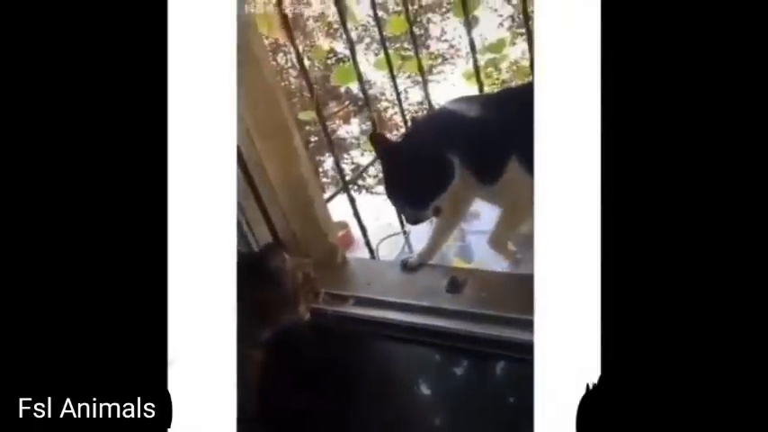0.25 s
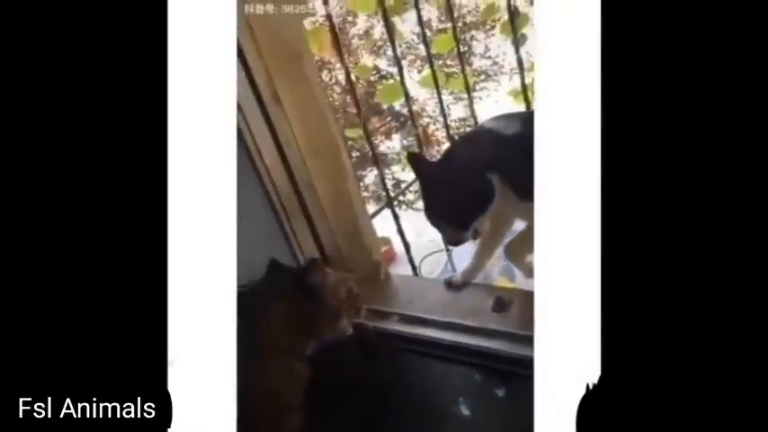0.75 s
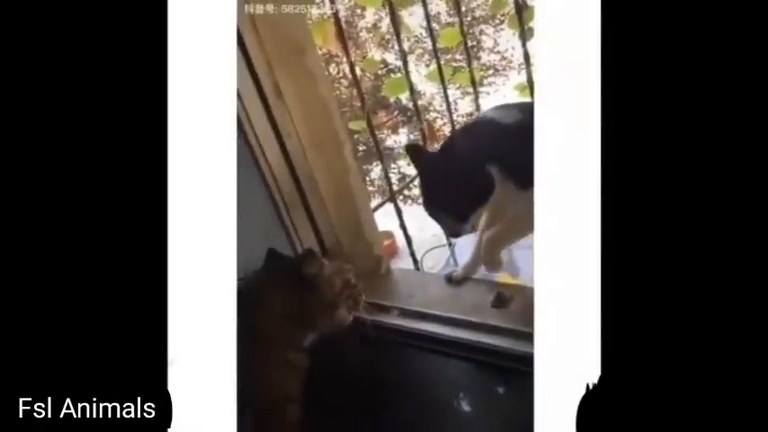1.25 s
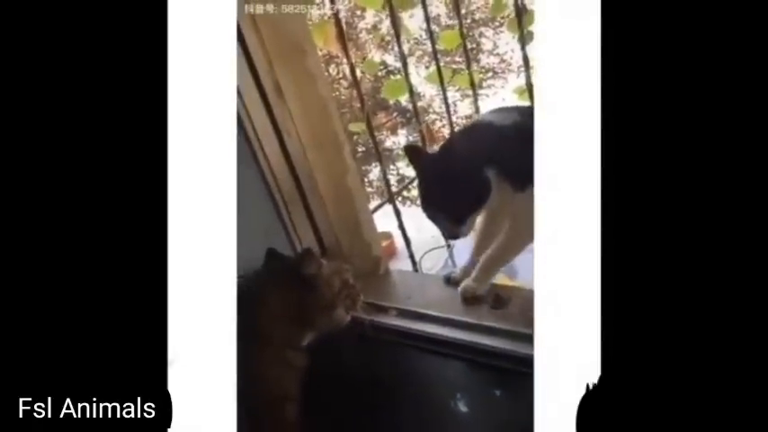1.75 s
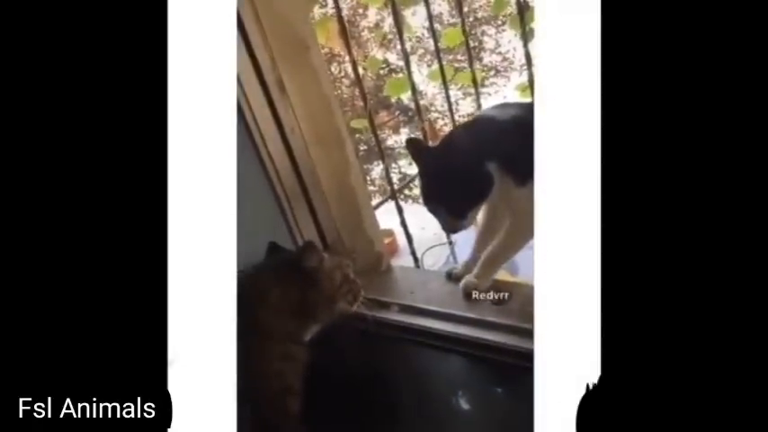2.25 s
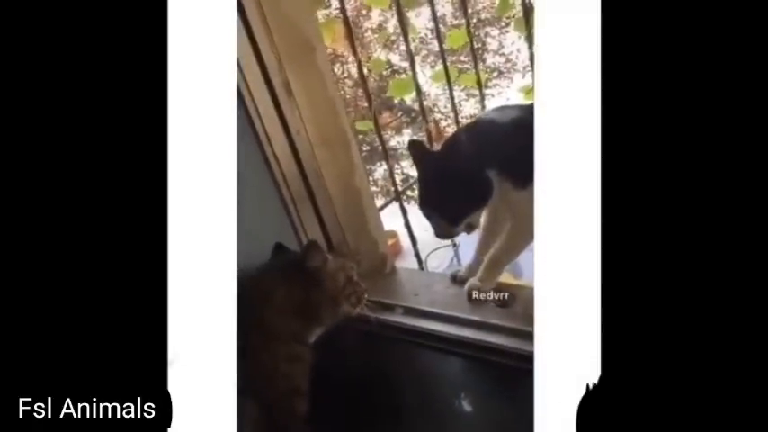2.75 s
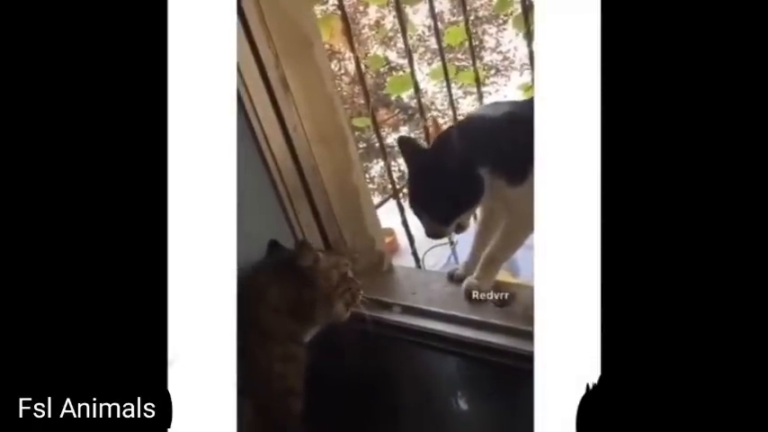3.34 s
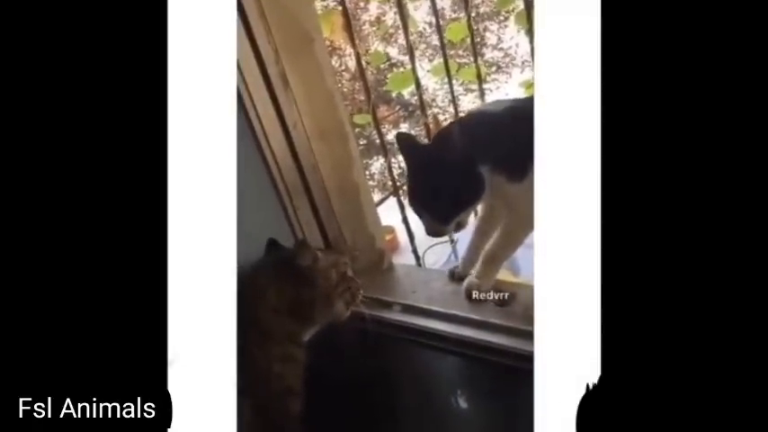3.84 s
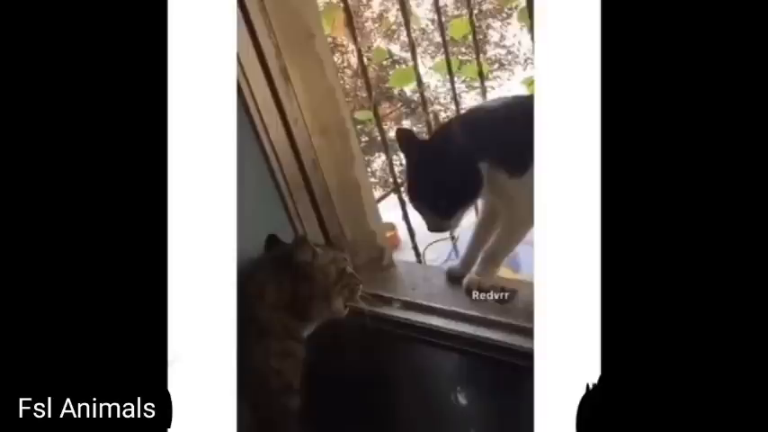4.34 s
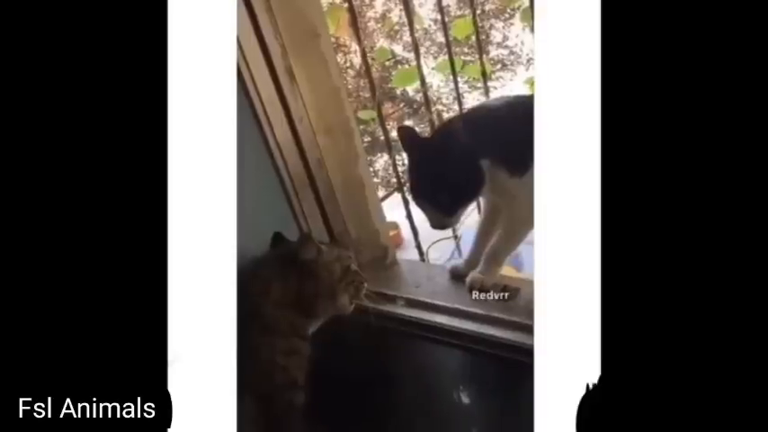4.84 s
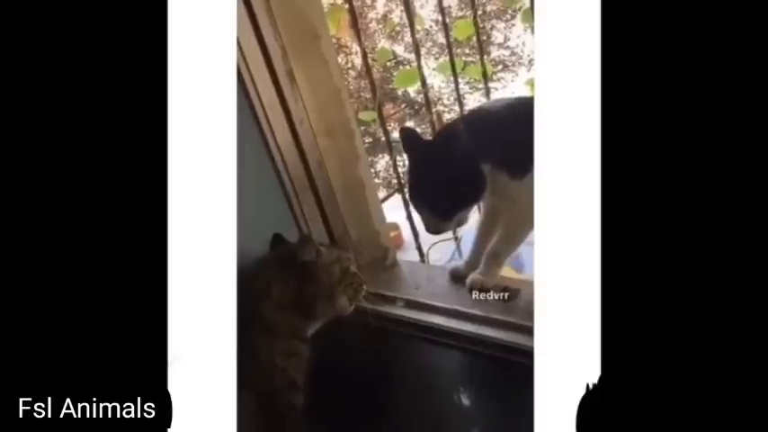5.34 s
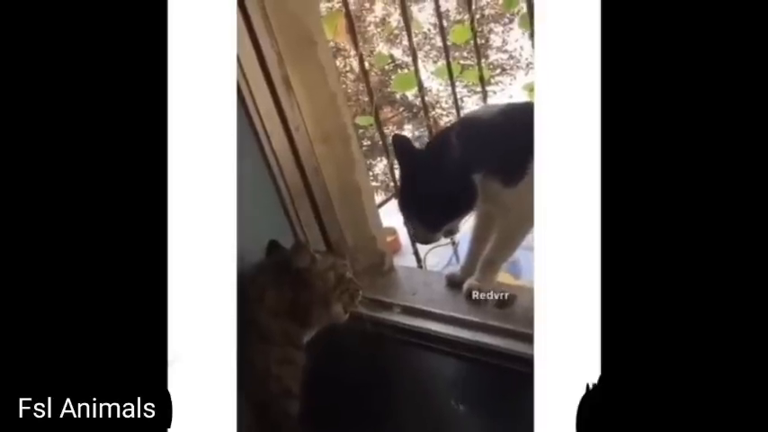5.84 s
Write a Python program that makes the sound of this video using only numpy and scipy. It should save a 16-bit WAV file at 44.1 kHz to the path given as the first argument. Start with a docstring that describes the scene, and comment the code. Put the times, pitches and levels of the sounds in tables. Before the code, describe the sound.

Two cats yowl at each other in a small room, one in clear gliding wails, the other in lower, hoarse moans.

```python
"""Two cats yowl at each other across the sill of an open window; a small hard room rings behind them.
They start together: one sinks in a long, clear wail, the other holds a lower, hoarse moan that breaks
into half tones and rasps. Both die away, with thin squeaks and soft ticks. At 2.4 s a second wail rises
and sinks, joined at 2.9 s by a moan that lasts to the end. At 5.1 s a third wail climbs as a faint low
rumble swells. Each voice is a source and a filter: vibrating vocal folds heard through resonances."""
import sys
import numpy as np
from scipy import signal
from scipy.fft import rfft, irfft, next_fast_len
from scipy.io import wavfile
from scipy.ndimage import map_coordinates

SR = 44100
rng = np.random.default_rng(int(sys.argv[2]) if len(sys.argv) > 2 else 0)


def pcm_store(signal):
    """Save signal as 16-bit PCM."""
    levels = np.round(np.clip(np.atleast_2d(signal), -1, 1) * 32767)
    wavfile.write(sys.argv[1], SR, levels.astype(np.int16).T)


N = 268128
TIME = np.arange(N) / SR


# one table a wail; the gains act chiefly on harmonic 2, on harmonics 3-4, and on all above:
# (time [s], pitch [Hz], throat gain [dB], mouth gain [dB], treble gain [dB])
FIRST_WAIL = [(0.0, 650.4, 12, -1, 9.5), (0.12, 648, 11, 0, 2), (0.24, 626.8, 10, -2, 5.5),
              (0.42, 620.7, 10.5, 2, 5.5), (0.63, 589, 2.5, -2, 1.5), (0.84, 578.9, 5.5, -7, 4),
              (0.87, 575, 1.5, -0.5, 6.5), (1.02, 553, 0, -7, 2), (1.05, 543.8, 1.5, 0, 2.5),
              (1.17, 539.3, 0.5, 2, 1), (1.23, 531.8, -2.0, -7, 1.5), (1.47, 501.1, 2.5, -0.5, -4.5),
              (1.56, 485.8, -2.5, -7.5, -0.5), (1.74, 432, 3, -12.0, -6.5), (1.781, 385, -9, -18, -12.0)]
SECOND_WAIL = [(2.395, 414, -15, -30, -24), (2.44, 418.7, 5.5, -3.5, -10.5), (2.56, 511, 3.5, 3, 2),
               (2.71, 578.6, 2, 0, 4), (2.8, 602.2, 1, 0, 5), (2.92, 612.6, -3.5, 0.5, 7),
               (3.01, 606, -5.5, -5.5, 6), (3.07, 613.4, 0, 5, 8), (3.221, 606.4, -7, -2.5, 6),
               (3.249, 603.6, 0, -0.5, 5), (3.67, 569.7, -3.5, 1, -1), (3.79, 561, -2.5, -1, 0),
               (3.941, 545.4, 1, 4, -1.5), (4.03, 529.3, -4, 1, -2), (4.18, 492.4, -3.5, -.5, -6),
               (4.27, 475, -9, 1, -13), (4.36, 441.6, -1.5, -8, -18), (4.441, 385, -6, -21, -19)]
THIRD_WAIL = [(5.12, 419.3, -14, -9, -18), (5.15, 411.7, -3.5, -18, -8), (5.24, 445.2, 4, -15, -15),
              (5.3, 475.7, -17, -3, -5), (5.331, 487, 0, 5, -5), (5.45, 531.4, -3.5, 6.5, 0.5),
              (5.57, 562, -4.5, 0.5, 0), (5.72, 591.3, -5, -0.5, 2.5), (5.81, 591.7, -18.5, -4, 3.5),
              (5.871, 602, 0, -1, 1.5), (6.061, 591.2, -7.5, 0.5, 3)]
# nasal ring, one row a wail: (centre [harmonic number], half width [harmonics], gain [dB])
NASAL_RINGS = [(11.8, 1.3, 9), (11.7, 1.66, 11), (9.35, 1.4, 9)]
def high_cat():
    """Phonation: nearly periodic vibration of the vocal folds gives three clear, gliding wails."""
    return sum(wail(rows, ring) for rows, ring in zip((FIRST_WAIL, SECOND_WAIL, THIRD_WAIL), NASAL_RINGS))


# vocal tract resonances for the four strong harmonics: (frequency [Hz], gain [dB])
TRACT_RESONANCES = [(400, -40), (530, -32.9), (640, -38), (850, -34), (1000, -22), (1130, -23.5),
                    (1270, -27), (1370, -39), (1460, -35.5), (1600, -25), (1720, -24.5), (1850, -28.5),
                    (1950, -38), (2100, -34.5), (2350, -21), (2600, -20.5)]
# breath noise: (frequency [Hz], relative spectral density [dB])
WAIL_BREATH = [(300, -16), (2000, 7.5), (3200, -6.5), (4100, -6), (5200, 1.5), (7000, 7), (9000, 3.5),
               (12000, -7.5)]
def wail(rows, ring, air_db=-61, shimmer=0.097, creak=0.36, strong_flicker_db=1.26, weak_flicker_db=4.0):
    """Source and filter: harmonics swell and fade as they slide through resonances, over faint breath."""
    at, t, gate = call_span(rows, attack_s=.003, release_s=0.024)
    pitch_hz, throat_db, mouth_db, treble_db = in_time(rows, t)
    slack = np.clip((520 - pitch_hz) / 100, 0, 1)   # slack folds at low pitch beat less evenly
    phase = fold_phase(pitch_hz, t, waver=.0015, jitter=.0015 + .012 * slack)
    efforts_db = [0.07 * throat_db, throat_db, mouth_db, mouth_db]   # the fundamental barely follows
    strong_db = [db + at_hz(TRACT_RESONANCES, k * pitch_hz) + strong_flicker_db * drift(13.8, t)
                 for k, db in enumerate(efforts_db, 1)]
    weak_db = [treble_db + head_db(k, pitch_hz, ring) + weak_flicker_db * drift(9.36, t)
               for k in range(5, 21)]
    push_db = 3 * np.log2(pitch_hz / pitch_hz.max())   # a higher wail is pushed with more air
    voice = from_db(treble_db + air_db + push_db) * colour(puffs(phase), WAIL_BREATH)
    for k, level_db in enumerate(strong_db + weak_db, 1):
        voice += np.sqrt(2) * from_db(level_db) * np.sin(k * phase)
    out = np.zeros(N)
    out[at] = voice * gate * (1 + shimmer * drift(60.27, t) + creak * slack * drift(130, t))
    return out


# upper resonances of the high cat: (frequency [Hz], gain [dB])
HEAD_RESONANCES = [(2200, -48.5), (2550, -48.5), (2800, -56.5), (3050, -45), (3300, -54), (3650, -64.5),
                   (4050, -77), (4400, -67), (4750, -65.7), (5150, -68), (5700, -71), (6300, -73),
                   (7600, -73), (9500, -80), (12000, -91.5)]
def head_db(k, pitch_hz, ring):
    """Formant filtering: gain of harmonic k from fixed resonances and a ring that follows the pitch."""
    centre, half_width, ring_db = ring
    return at_hz(HEAD_RESONANCES, k * pitch_hz) + ring_db * np.exp(-((k - centre) / half_width) ** 2)


# one table a moan, with the relative levels of its three resonances:
# (time [s], pitch [Hz], throat level [dB], mouth level [dB], edge level [dB])
FIRST_MOAN = [(0, 445.8, -32.5, -21, -30), (.16, 454.3, -38.5, -25, -29.5), (.24, 451, -36, -25, -37.5),
              (.45, 432, -35.5, -25, -33.5), (.6, 406.8, -35, -23.5, -39.5), (.88, 396.2, -41, -23, -36),
              (1.06, 381.1, -40, -25.5, -41), (1.25, 340.2, -42, -22.5, -45),
              (1.52, 339.3, -60, -27.5, -50), (1.72, 327.3, -33, -31, -45.5),
              (1.88, 334.7, -36.5, -28.5, -42), (2.09, 315.6, -28.5, -28.5, -50),
              (2.2, 281.5, -27.5, -44, -57), (2.24, 252.4, -47, -45, -68)]
SECOND_MOAN = [(2.9, 438, -32.5, -36, -58), (2.98, 342.7, -41.5, -42, -56), (3.16, 364.3, -44, -46, -70),
               (3.25, 325.3, -42.5, -35, -58), (3.36, 349, -45, -36.5, -73), (3.6, 347.4, -43, -37, -63),
               (3.85, 363.4, -36.5, -39, -68), (4.24, 385.6, -40.5, -32, -37),
               (4.42, 354.2, -38.5, -30.5, -42), (4.58, 346, -33.5, -25.5, -60),
               (4.76, 334.8, -38.5, -28.5, -54), (4.9, 325.3, -31.5, -27, -64.5),
               (5.04, 358, -31, -27.5, -65), (5.17, 337.6, -37.5, -23, -62), (5.34, 327, -29, -27.5, -43.5),
               (5.62, 316.2, -42.5, -36, -38.5), (5.86, 346.4, -37.5, -36.5, -42),
               (6.08, 336, -46, -33.5, -43.5)]
def low_cat():
    """Irregular phonation: unevenly beating folds give two moans, the second hoarser."""
    first = moan(FIRST_MOAN, attack_s=0.0013, rest_half_db=-27, rest_rasp_db=-20.5, fundamental_db=-31.5)
    second = moan(SECOND_MOAN, attack_s=0.013, rest_half_db=-20, rest_rasp_db=-13.5, fundamental_db=-30)
    return first + second


# resonances that follow the jaw: (time [s], mouth centre [Hz], mouth bandwidth [Hz], edge centre [Hz])
JAW_RESONANCES = [(0, 2016, 562, 3530), (.9, 2000, 325, 3240), (1.2, 1790, 396, 2860),
                  (2.05, 1785, 545, 3000), (2.24, 1620, 500, 2800), (3.2, 1605, 610, 3230),
                  (3.6, 1813, 519.4, 3250), (4.25, 1935, 680.6, 2710), (4.6, 1946, 496, 3160),
                  (4.9, 1820, 547, 3000), (5.03, 1745, 230, 3000), (5.25, 1740, 228.2, 3000),
                  (5.6, 1876, 610, 2860)]
# brief dips of the fundamental: (time [s], half length [s], depth [dB])
DROPOUTS = [(3.05, 0.072, 7), (4.88, 0.036, 16), (5.384, 0.071, 12.5)]
# turbulence in the throat: (frequency [Hz], relative spectral density [dB])
MOAN_BREATH = [(120, -35), (220, -33), (500, -6.5), (750, -17), (1050, -2.5), (1450, -11.5), (1800, 7),
               (2350, 2.5), (2580, 1), (2800, -25), (3300, -18.5), (4200, -46.5)]
# thin treble of the closing folds: (frequency [Hz], relative gain [dB])
MOAN_TREBLE = [(3600, -18), (4500, 8), (5500, 5.5), (7500, -6), (12000, -21.5)]
def moan(rows, attack_s, rest_half_db, rest_rasp_db, fundamental_db, count=28):
    """Period doubling: alternating strong and weak cycles add half tones; uneven cycles add rasp."""
    at, t, gate = call_span(rows, attack_s, release_s=0.0085)
    pitch_hz, throat_db, mouth_db, edge_db = in_time(rows, t)
    mouth_hz, mouth_width_hz, edge_hz = in_time(JAW_RESONANCES, t)
    half_db, rasp_db = hoarseness(t, rest_half_db, rest_rasp_db)
    rasp = from_db(rasp_db)
    phase = fold_phase(pitch_hz, t, waver=.0042, jitter=.005) + .2 * rasp * drift(200, t)
    multiple = np.arange(2, count + 2)[:, None] / 2   # harmonics and the half tones between them
    partial_hz = multiple * pitch_hz
    flicker = from_db([3 * drift(12, t) for _ in multiple])
    strength = np.where(multiple % 1 == 0, 1, from_db(half_db)) * flicker
    notch = 1 - from_db(-7.5) * np.exp(-((partial_hz - 2920) / 240) ** 2)   # cut by a side cavity
    throat = from_db(throat_db - 4.5) * resonance(partial_hz, strength, hz=1000, width_hz=426)
    mouth = from_db(mouth_db - 2.2) * resonance(partial_hz, strength * notch, mouth_hz, mouth_width_hz)
    edge = from_db(edge_db - 3) * resonance(partial_hz, strength, edge_hz, width_hz=610)
    amplitude = np.sqrt(throat ** 2 + mouth ** 2 + edge ** 2)
    voice = np.sum(amplitude * np.sin(multiple * phase + rng.uniform(0, 2 * np.pi, (count, 1))), axis=0)
    voice *= 1 + 0.64 * rasp * drift(330, t)
    voice += from_db(np.maximum(mouth_db, throat_db) - 1) * rasp * colour(puffs(phase), MOAN_BREATH)
    # the fundamental and its subharmonic take part of the mouth's swing
    dropout_db = sum(depth_db * np.exp(-((t - s) / half_s) ** 2) for s, half_s, depth_db in DROPOUTS)
    low_tones = np.sin(phase) + from_db(half_db - 13.5) * np.sin(phase / 2)
    voice += from_db(0.42 * mouth_db + fundamental_db - dropout_db) * low_tones
    # the sharp closing of the folds and its turbulence give a thin treble
    closing = rms_one(sum(np.cos(k * phase) for k in range(1, count))) + 2.1 * puffs(phase)
    voice += from_db((edge_db + mouth_db) / 2 - 25) * colour(closing, MOAN_TREBLE)
    out = np.zeros(N)
    out[at] = voice * gate
    return out


# fits in which the moan breaks up: (start [s], length [s], half tone gain [dB], rasp gain [dB])
VOICE_BREAKS = [(0.134, 0.052, 2, -5.5), (1.771, 0.023, -19, -9), (2.211, 0.041, -10, -10.5),
                (2.882, .06, -9, -12), (3.237, 0.07, -15, -3), (3.502, .6, 1, -9.5), (4.149, .3, -2.5, -9),
                (4.497, 0.26, -5.5, -14), (4.955, 0.14, 0, -8.5), (5.647, 0.37, 4, -14.5)]
def hoarseness(t, half_db, rasp_db, fade_db_per_s=351.5):
    """Voice breaks: each fit lifts half tones and rasp above their resting levels for a while."""
    for start, length, fit_half_db, fit_rasp_db in VOICE_BREAKS:
        fade_db = fade_db_per_s * np.abs(t - np.clip(t, start, start + length))
        half_db = np.maximum(half_db, fit_half_db - fade_db)
        rasp_db = np.maximum(rasp_db, fit_rasp_db - fade_db)
    return half_db, rasp_db


def resonance(partial_hz, strength, hz, width_hz):
    """Resonance: a Lorentzian peak weights the partials' amplitudes, scaled to unit total power."""
    amplitude = strength / (1 + ((partial_hz - hz) / (width_hz / 2)) ** 2)
    return amplitude / np.sqrt(np.sum(amplitude ** 2, axis=0) / 2)


def fold_phase(pitch_hz, t, waver, jitter):
    """Phase is the integral of frequency, here with a slow waver and a fast jitter."""
    return 2 * np.pi * np.cumsum(pitch_hz * (1 + waver * drift(35.01, t) + jitter * drift(400, t))) / SR


def puffs(phase):
    """Pulsed turbulence: noise comes once a cycle, while the folds are open."""
    return rms_one(rng.standard_normal(len(phase)) * (1 + np.cos(phase)))


# a mouth closes or opens: (time [s], length [s], start pitch [Hz], end pitch [Hz], level [dB])
SQUEAKS = [(1.1, .75, 11610, 11300, -63), (2.14, 0.08, 5100, 4410, -53), (2.404, 0.057, 5950, 6340, -57)]
def squeaks():
    """Frequency modulation: thin, unsteady whistles glide as they swell and fade."""
    out = np.zeros(N)
    for s, length, start_hz, end_hz, level_db in SQUEAKS:
        age = TIME[:int(length * SR)]
        phase = fold_phase(np.linspace(start_hz, end_hz, len(age)), age, waver=0.0036, jitter=.015)
        envelope = from_db(level_db) * np.sin(np.pi * age / length)
        out[int(s * SR):int(s * SR) + len(age)] += envelope * np.sin(phase)
    return out


# soft ticks of lips and paws: (time [s], level [dB], frequency [Hz], time to fall 60 dB [s])
TICKS = [(2.286, -52.5, 5750, 0.066), (2.305, -55.5, 3070, 0.072), (2.331, -54.5, 3310, 0.037),
         (3.935, -50, 3670, .08), (4.775, -49.5, 4543, .07), (4.998, -49, 5535, 0.092),
         (5.191, -47, 3940, 0.15)]
def ticks():
    """Damped transients: each contact is a burst of band-limited noise that decays exponentially."""
    out = np.zeros(N)
    age = TIME[:SR // 5]
    for s, level_db, hz, t60_s in TICKS:
        burst = rms_one(band(rng.standard_normal(len(age)), hz * 0.75, hz * 1.12))
        envelope = from_db(level_db - 60 * age / t60_s) * np.minimum(age / 0.0022, 1)
        out[int(s * SR):int(s * SR) + len(age)] += burst * envelope
    return out


def room(x, t60_s=.42, treble_t60_s=.22):
    """Reverberation: diffuse reflections from near walls decay exponentially, the treble first."""
    age = TIME[:SR // 2]
    decay = from_db(-60 * age / t60_s)
    low = band(rng.standard_normal(len(age)), 220, 3600) * decay
    high = band(rng.standard_normal(len(age)), 2700, 17000) * from_db(-60 * age / treble_t60_s)
    onset = np.clip(age / 0.03, 0, 1)
    norm = np.sqrt(np.sum((onset * decay) ** 2))
    return signal.fftconvolve(x, (low + high) * onset / norm)[:N]


# spectrum of the background: (frequency [Hz], relative spectral density [dB])
RUMBLE_SPECTRUM = [(25, -11.5), (42, -21.5), (60, 0.5), (85, -3.5), (120, -5), (160, -5), (250, -10),
                   (600, -13), (1500, -5), (3000, -34), (10000, -38)]
# its slow swell: (time [s], level [dB])
RUMBLE_LEVEL = [(0, -56.5), (2.5, -54.5), (4.6, -55), (5.2, -50.5), (6.08, -51.5)]
def rumble():
    """Coloured noise: a spectrum weighted toward the bass is heard as a faint rumble."""
    return from_db(in_time(RUMBLE_LEVEL, TIME)[0]) * colour(rng.standard_normal(N), RUMBLE_SPECTRUM)


def call_span(rows, attack_s, release_s):
    """Amplitude envelope: the sample numbers, times and on-off gate of one call."""
    start, end = rows[0][0], rows[-1][0] + release_s
    at = np.flatnonzero((TIME >= start) & (TIME <= end))
    t = TIME[at]
    return at, t, np.clip((t - start) / attack_s, 0, 1) * np.clip((end - t) / release_s, 0, 1)


def drift(rate, t):
    """Random modulation: a smooth curve of spread near 1 that changes about rate times a second."""
    steps = rng.standard_normal(4000)
    coarse = t[::16]
    return np.interp(t, coarse, map_coordinates(steps, [(coarse - t[0]) * rate], order=3, mode="wrap"))


def colour(x, points):
    """Spectral shaping: filter a signal by a gain curve, then scale it to unit power."""
    size = next_fast_len(len(x))
    gain = from_db(at_hz(points, np.arange(size // 2 + 1) * SR / size))
    return rms_one(irfft(rfft(x, size) * gain, size)[:len(x)])


def band(x, low_hz, high_hz):
    """Butterworth band-pass filtering."""
    return signal.sosfilt(signal.butter(2, [low_hz, high_hz], "band", fs=SR, output="sos"), x)


def in_time(rows, t):
    """Linear interpolation of a table's columns at the times t."""
    s, *columns = np.transpose(rows)
    return [np.interp(t, s, c) for c in columns]


def at_hz(points, hz):
    """Interpolation of a spectrum in dB on a log-frequency axis."""
    f, db = np.transpose(points)
    return np.interp(np.log(hz + 1e-9), np.log(f), db)


def from_db(db):
    """Decibels to amplitude ratio."""
    return 10 ** (np.asarray(db) / 20)


def rms_one(x):
    """Normalisation to unit power."""
    return x / np.sqrt(np.mean(x ** 2) + 1e-20)


def scene():
    """Superposition: the cats' direct sound, the rumble and the room's reflections add in one channel."""
    direct = high_cat() + low_cat() + ticks() + squeaks()
    return (direct + rumble() + from_db(-8) * room(direct))[None]


def record(dry, cutoff_hz=12400):
    """Band limiting: an elliptic low-pass filter cuts the top steeply."""
    return signal.sosfilt(signal.ellip(10, .1, 80, cutoff_hz, fs=SR, output="sos"), dry)


dry = scene()
out = record(dry)
pcm_store(out)
```